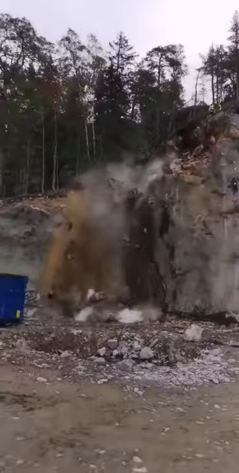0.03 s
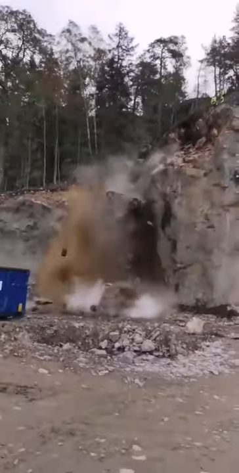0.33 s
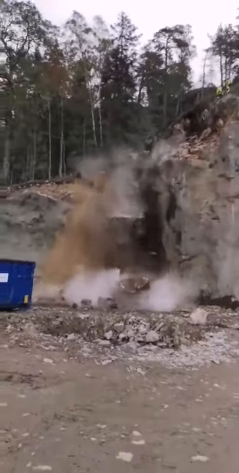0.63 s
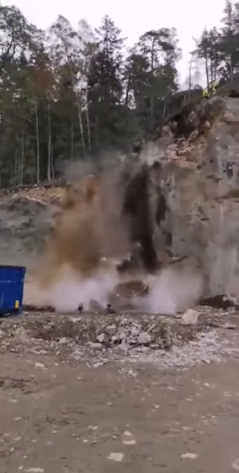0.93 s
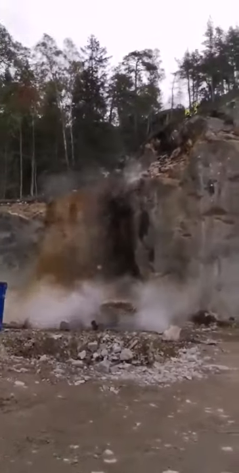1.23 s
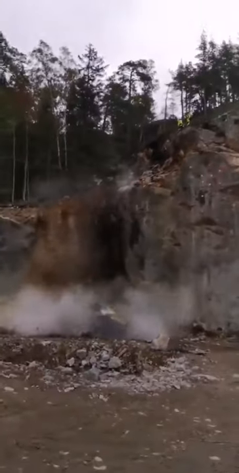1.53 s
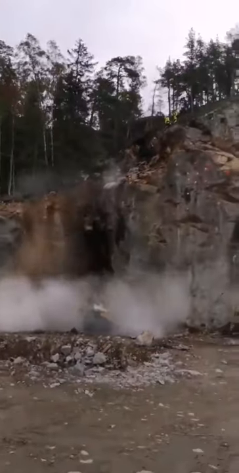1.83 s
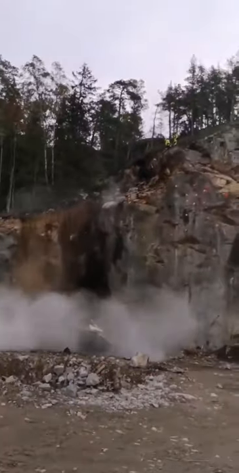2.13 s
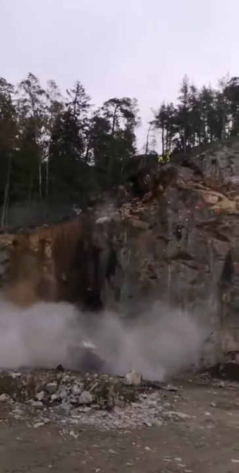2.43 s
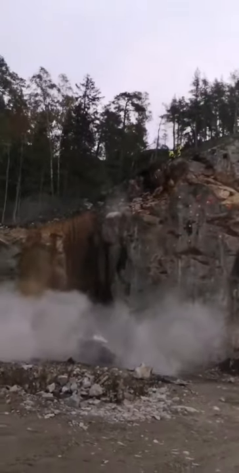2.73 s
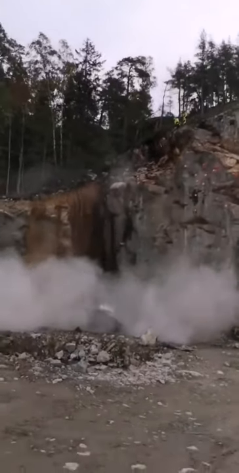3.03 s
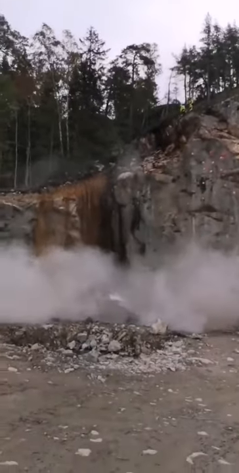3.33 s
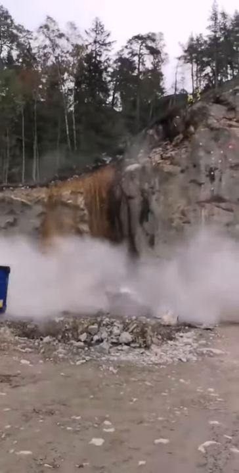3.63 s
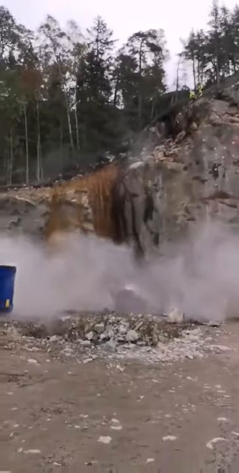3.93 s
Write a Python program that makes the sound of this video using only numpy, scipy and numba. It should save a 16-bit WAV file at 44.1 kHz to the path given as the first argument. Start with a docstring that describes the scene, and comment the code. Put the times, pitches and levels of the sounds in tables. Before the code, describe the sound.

Falling rock crashes and rumbles down a quarry cliff, easing into scattered knocks and trickling gravel.

```python
"""Heavy thuds come first: boulders hit the ground as a quarry face collapses some tens of metres away.
Earth rumbles, stones knock and crack together, and rubble and gravel pour down after them,
in surges that thin out to single falls. Each hit is a short tone that dies away; thousands of them
blend into a rattle. The rock wall throws the sound back, and the heaviest blows overload the microphone."""
import sys
import numpy as np
from scipy import signal
from scipy.fft import rfft, irfft
from scipy.io import wavfile
from scipy.ndimage import uniform_filter1d
from numba import njit

SR = 44100
rng = np.random.default_rng(int(sys.argv[2]) if len(sys.argv) > 2 else 0)


def pcm_store(signal):
    """Save signal as 16-bit PCM."""
    levels = np.round(np.clip(np.atleast_2d(signal), -1, 1) * 32767)
    wavfile.write(sys.argv[1], SR, levels.astype(np.int16).T)


N = 176400  # 4 s

# Levels in the tables are relative. A ring time is how long a sound takes to fade by 60 dB.
# Boulders landing: t/s, level/dB, f/Hz, ring time/s
BOULDER_HITS = [(0.001, -3.5, 129, 0.026), (0.014, 3.5, 104, 0.055), (0.048, -4, 127, 0.12),
                (0.068, -4, 100.6, 0.14), (0.267, -19, 222, 0.065), (0.325, -15, 302, 0.12),
                (0.403, -13, 197, 0.031), (0.654, -11, 152, 0.087), (0.968, -12.5, 108, 0.049),
                (1.255, -6.5, 172.6, .065), (1.289, -7, 52.6, 0.27), (1.437, -18.5, 195, 0.03),
                (1.454, -16, 96, 0.063), (1.488, -17, 74, .09), (1.634, -15, 185, 0.012),
                (2.445, -13.5, 126, 0.023), (2.497, -23.5, 172, 0.034), (2.727, -19, 90, 0.067),
                (2.786, -14, 117, 0.039), (2.821, -15, 109, 0.031), (2.876, -14.5, 134, 0.03),
                (2.9, -15.5, 110, 0.052), (3.179, -20, 155, 0.046), (3.205, -20, 48, 0.13),
                (3.23, -30, 204, 0.053), (3.653, -18, 146, 0.045), (3.739, -20, 64, 0.066),
                (3.752, -23.5, 190, 0.058), (3.813, -19.5, 144, 0.027)]
# How much is falling: t/s, rumble level/dB, stone level/dB, gravel level/dB
DEBRIS_FLOW = [(0.0, -7.5, -14, -22), (0.09, -18.5, -24, -22), (0.11, -11.5, -18.5, -25),
               (0.24, -24, -28.5, -26.5), (0.33, -13.5, -23.5, -25), (0.37, -21.5, -24, -25.5),
               (0.5, -15, -24.5, -27.5), (0.56, -26, -29.5, -28), (0.59, -32, -31.5, -33),
               (0.66, -24, -28.5, -31), (0.69, -20, -25.5, -30), (0.95, -25, -32, -30),
               (0.99, -21, -26, -28), (1.07, -29, -29, -30.5), (1.22, -29, -29.5, -33.5),
               (1.26, -21, -26, -27.5), (1.31, -13, -21, -30), (1.4, -30, -32.5, -36),
               (1.49, -22.5, -31, -33), (1.59, -34, -37.5, -38), (1.65, -28, -35, -35.5),
               (1.94, -32.5, -37.5, -36.5), (1.95, -31, -35, -34.5), (2.19, -27, -32, -36),
               (2.23, -27.5, -32.5, -33.5), (2.42, -34, -33, -36.5), (2.44, -26.5, -35, -36.5),
               (2.58, -37, -40, -39.5), (2.73, -19.5, -29.5, -34), (2.84, -27.5, -34, -34),
               (2.91, -19, -28.5, -33), (2.94, -30, -32, -35), (3.11, -36, -38.5, -41),
               (3.16, -27, -31.5, -34), (3.24, -24.5, -32.5, -38), (3.32, -44, -43, -43),
               (3.41, -30.5, -37, -39), (3.61, -55, -46.5, -43), (3.65, -24, -40, -40.5),
               (3.72, -27.5, -45, -44.5), (3.74, -25, -38, -41), (3.8, -47, -53, -42.5),
               (3.83, -26.5, -35.5, -42.5), (4.0, -43, -45, -43.5)]
# Single stones cracking on rock: t/s, level/dB, f/Hz, splinter level/dB
STONE_CRACKS = [(0.007, -19, 900, -32), (0.111, -22, 1220, -17), (0.412, -22, 2070, -27),
                (1.271, -14, 1900, -25), (1.474, -23.5, 1740, -38), (1.949, -19, 1860, -27),
                (1.989, -20, 887, -43.5), (2.882, -25, 1120, -37), (3.168, -17.5, 1060, -35),
                (3.326, -25, 1000, -50), (3.735, -30.5, 1150, -35), (3.813, -34.5, 2000, -31.5)]
# The tones a struck stone rings with: multiple of its pitch, level/dB
STONE_TONES = [(.72, -2.5), (.91, 1), (1.07, 3.5), (1.26, -4), (1.7, -5)]
# Loads of broken rock crashing down: t/s, length/s, level/dB, f/Hz
RUBBLE_LOADS = [(0.39, .04, -33, 1700), (0.476, .035, -28, 900), (0.522, 0.04, -22.5, 700),
                (0.978, 0.07, -33.5, 1620), (1.278, 0.034, -28, 1700), (1.267, 0.078, -24, 226),
                (3.32, .03, -39, 1000), (2.19, 0.12, -33, 510), (2.881, 0.056, -32.5, 670),
                (3.164, .075, -52, 330), (3.192, 0.09, -38.5, 2140), (3.378, 0.055, -48, 920),
                (3.828, .045, -48, 1980)]
# Gravel thrown against the rock: t/s, level/dB, time to fade to about a third/s
GRAVEL_SPRAYS = [(0.113, -19.5, 0.024), (0.535, -28.5, 0.023), (1.29, -27, 0.056), (2.69, -26.5, 0.01),
                 (3.025, -28.5, 0.011), (3.255, -37, .022), (3.83, -35, 0.023)]
# Deep tone colour of pounded earth: f/Hz, level/dB
EARTH_COLOUR = [(12, -38), (20, -2), (37, -3.5), (54, -1), (81, -1.5), (167, -4.5), (241, -4.5), (330, -7),
                (535, -30.5), (600, -30), (780, -20), (1320, -120)]
# Mid-range tone colour of knocking stones as heard through the microphone,
# including the microphone's peaks near 1100 and 1900 Hz: f/Hz, level/dB
STONES_VIA_MIC = [(240, -7.5), (400, -0.5), (557, -7), (1140, -0.5), (1460, -10.5), (1880, -3.5),
                  (2420, -15), (2760, -31), (3200, -16), (4160, -47), (7040, -120)]
# Bright tone colour of gravel as heard through the microphone,
# including the microphone's peaks near 5900 and 8200 Hz: f/Hz, level/dB
GRAVEL_VIA_MIC = [(1410, -34.5), (2400, -5.5), (2760, -3.5), (3300, -9), (3570, -5), (4730, -7.5),
                  (5730, -0.5), (6040, -0.5), (6950, -5.5), (8230, 2), (9540, -8), (11000, -10.5),
                  (14000, -24)]

THUD_ATTACK_S, THUD_GRIT = 0.0022, 0.18
CLODS_PER_S, STONES_PER_S, GRAVEL_PER_S, CHINKS_PER_S = 420, 1900, 7000, 2500
RUMBLE_DB, STONES_DB, GRAVEL_DB = -2.5, -1, -1
CHINK_DB = -4  # ringing chips against the dull ticks
CRACK_RING_S, CRACK_GRIT, SPLINTER_S = 0.025, 0.33, 0.0093
CRASH_ATTACK_S, CRASH_RELEASE_S, CRASH_BAND_RATIO, CRASH_HITS_PER_S = 0.0084, 0.0041, 1.93, 2200
WALL_DELAY_S, WALL_RING_S, WALL_DB = .03, 0.35, -13
LOW_CUT_HZ, TOP_HZ = 30, 14000
CEILING, KNEE = .74, 4  # where the overload flattens the wave, and how sharply


def boulders(t):
    """Each boulder gives the ground a push that quickly dies away, with a crunch of crushed soil."""
    out = np.zeros(N)
    crunch = unit(band(rng.standard_normal(N), 85, 368))
    for start, db, hz, ring_s in BOULDER_HITS:
        age = np.maximum(t - start, 0)
        shape = (1 - np.exp(-age / THUD_ATTACK_S)) ** 2 * fade(age, ring_s)
        thud = np.sin(2 * np.pi * hz * age) + THUD_GRIT * crunch
        out += undb(db) * shape / shape.max() * thud
    return out


def rumble():
    """Clods and blocks pound the ground in a dense, low patter."""
    blows = colour(shower(CLODS_PER_S, 13.4, 590, cycles=1.72, scatter_db=-2.5), EARTH_COLOUR)
    loudness = np.sqrt(uniform_filter1d(blows ** 2, size=4000) + 1e-18)
    steady = blows / loudness
    return steady * falling(column=1) * undb(RUMBLE_DB)


def stones():
    """Fist-sized stones knock against each other as they tumble."""
    knocks = colour(shower(STONES_PER_S, 356, 3470, cycles=8.5, scatter_db=-2.0), STONES_VIA_MIC)
    return unit(knocks) * falling(column=2) * undb(STONES_DB + 0.33 * wander(per_s=27))


def cracks(t):
    """A hard stone strikes rock: it rings briefly, with a rough edge and a tick of splinters."""
    out = np.zeros(N)
    splinters = unit(colour(rng.standard_normal(N), GRAVEL_VIA_MIC))
    age = t[:SR // 10]
    shape = fade(age, CRACK_RING_S)
    for start, db, hz, splinter_db in STONE_CRACKS:
        tones = 0
        for ratio, tone_db in STONE_TONES:
            tone_hz = hz * ratio * (1 + 0.03 * rng.standard_normal())
            tones += undb(tone_db) * np.sin(2 * np.pi * (tone_hz * age + rng.random()))
        grit = unit(band(rng.standard_normal(len(age)), hz / 1.35, hz * 1.5))
        body = (unit(tones) + CRACK_GRIT * grit) * shape
        body = unit(body) * np.sqrt(np.mean(shape ** 2))  # same energy whatever the mix of tones
        first = int(start * SR)
        span = slice(first, first + len(age))
        tick = splinters[span] * np.exp(-age / SPLINTER_S)
        out[span] += undb(db) * body + undb(splinter_db) * tick
    return out


def gravel(t):
    """Grit ticks and hard chips chink down the face, with sprays where a block bursts."""
    grit = unit(shower(GRAVEL_PER_S, 2010, 15100, cycles=4.9, scatter_db=-2.5))
    chips = unit(shower(CHINKS_PER_S, 2019, 15190, cycles=190, scatter_db=2.0))
    ticks = unit(colour(grit + undb(CHINK_DB) * chips, GRAVEL_VIA_MIC))
    flow = falling(column=3) * undb(GRAVEL_DB + 0.41 * wander(per_s=45))
    for start, db, decay_s in GRAVEL_SPRAYS:
        age = np.maximum(t - start, 0)
        flow += undb(db) * (1 - np.exp(-age / 0.0062)) * np.exp(-age / decay_s)
    return ticks * flow


def crashes(t):
    """A load of rubble lands: a quick rise, a rough tumble, a sudden end."""
    out = np.zeros(N)
    rubble = shower(CRASH_HITS_PER_S, 100, 4600, cycles=3.3, scatter_db=3.5)
    for start, length, db, hz in RUBBLE_LOADS:
        age = np.maximum(t - start, 0)
        rise = 1 - np.exp(-age / CRASH_ATTACK_S)
        ending = np.exp(-np.maximum(age - length, 0) / CRASH_RELEASE_S)
        tumble = unit(band(rubble, hz / CRASH_BAND_RATIO, hz * CRASH_BAND_RATIO))
        out += undb(db) * rise * ending * tumble
    return out


def wall_echo(x, t):
    """The rough rock wall sends back a scattered, duller echo."""
    age = t - WALL_DELAY_S
    scatter = band(rng.standard_normal(N), 90, 4600, order=1)
    tail = scatter * (age > 0) * fade(abs(age), WALL_RING_S)
    return undb(WALL_DB) * signal.fftconvolve(x, tail / np.linalg.norm(tail))[:N]


def shower(per_s, lo_hz, hi_hz, cycles, scatter_db):
    """Hits of random time and pitch. With scatter_db above 0 a few stand out; below 0 a few are weak."""
    count = int(per_s * N / SR)
    when, pitch, length, size, sign = rng.random((60000, 5))[:count].T
    hz = lo_hz + (hi_hz - lo_hz) * pitch
    strength = undb(-scatter_db * np.log(0.018 + size))
    gain = np.sqrt(hz) * np.sign(sign - .5) * strength
    return ring(when * N, hz, cycles * (.5 + length), gain)


@njit
def ring(start, hz, cycles, gain):
    """Add up short tones, each fading by 60 dB over its number of cycles."""
    out = np.zeros(N)
    for k in range(len(start)):
        step = hz[k] / SR
        tone = gain[k] + 0j
        turn_and_shrink = np.exp(step * (2j * np.pi - 6.9 / cycles[k]))
        for i in range(int(start[k]), min(N, int(start[k] + cycles[k] / step))):
            out[i] += tone.imag
            tone *= turn_and_shrink
    return out


def falling(column):
    """How strongly one size of debris falls over time, as a gain."""
    rows = np.array(DEBRIS_FLOW)
    return undb(np.interp(np.arange(N) / SR, rows[:, 0], rows[:, column]))


def wander(per_s):
    """A line that glides between random values, typically about 1 in size."""
    hold = max(int(SR / per_s), 2)
    steps = np.repeat(rng.standard_normal(2000), hold)[:N]
    return unit(uniform_filter1d(steps, hold))


def colour(x, points, skirt_db=30):
    """Shape the tone along (f/Hz, level/dB) points, dropping skirt_db an octave beyond them."""
    hz, db = np.array(points).T
    octave = np.log2(np.maximum(np.arange(N + 1) * SR / (2 * N), 1))
    knots = np.log2(hz)
    outside = np.maximum(knots[0] - octave, 0) + np.maximum(octave - knots[-1], 0)
    gain = undb(np.interp(octave, knots, db) - skirt_db * outside)
    # these two steps make the filter ring after a hit, never before it
    cepstrum = irfft(np.log(gain + 1e-4))
    response = np.exp(rfft(2 * cepstrum[:N], 2 * N))
    return irfft(rfft(x, 2 * N) * response)[:N]


def band(x, lo_hz, hi_hz, order=2):
    """Keep the sound between two frequencies."""
    return signal.sosfilt(signal.butter(order, [lo_hz, hi_hz], "band", fs=SR, output="sos"), x)


def fade(age, ring_s):
    """A gain that drops by 60 dB in ring_s seconds."""
    return np.exp(-np.log(1000) * age / ring_s)


def undb(db):
    """Turn decibels into a gain."""
    return 10 ** (np.asarray(db) / 20)


def unit(x):
    """Scale to an average strength (rms) of 1."""
    return x / np.sqrt(np.mean(x ** 2))


def scene():
    """All sizes of debris fall together in front of the wall."""
    t = np.arange(N) / SR
    rockfall = rumble() + stones() + gravel(t) + boulders(t) + crashes(t) + cracks(t)
    return (rockfall + wall_echo(rockfall, t))[None]


def record(dry):
    """The microphone drops the deepest bass and flattens the heaviest blows; the highest treble is cut."""
    heard = signal.sosfilt(signal.butter(2, LOW_CUT_HZ, "high", fs=SR, output="sos"), dry)
    flattened = heard / (1 + abs(heard / CEILING) ** KNEE) ** (1 / KNEE)
    return signal.sosfilt(signal.ellip(10, .2, 80, TOP_HZ, fs=SR, output="sos"), flattened)


dry = scene()
out = record(dry)
pcm_store(out)
```